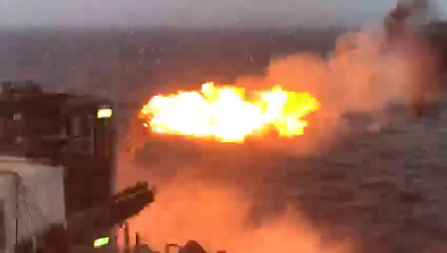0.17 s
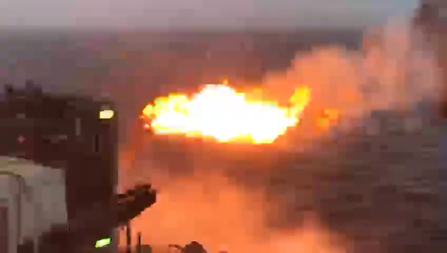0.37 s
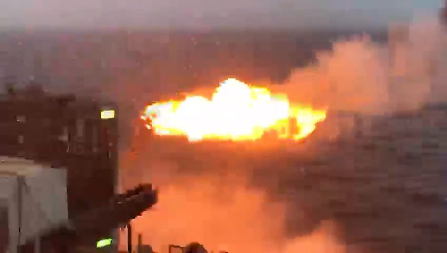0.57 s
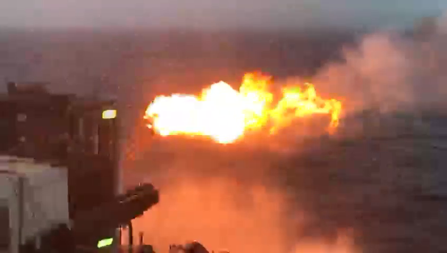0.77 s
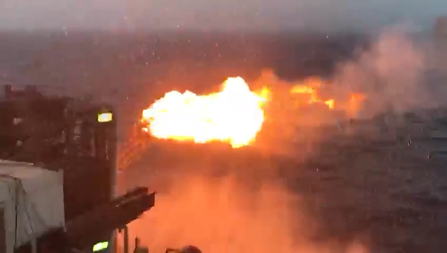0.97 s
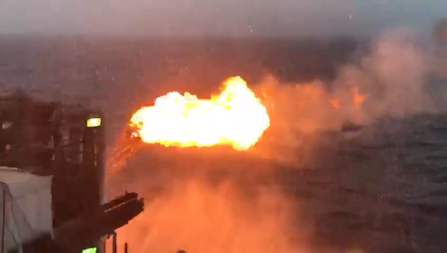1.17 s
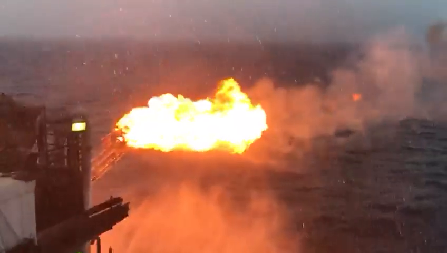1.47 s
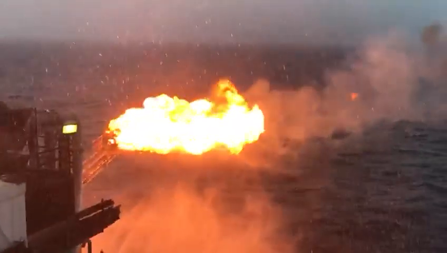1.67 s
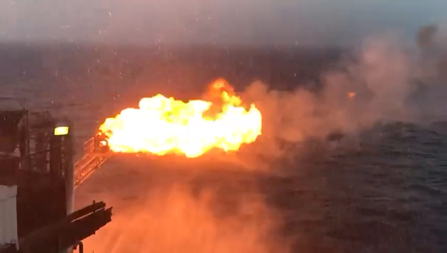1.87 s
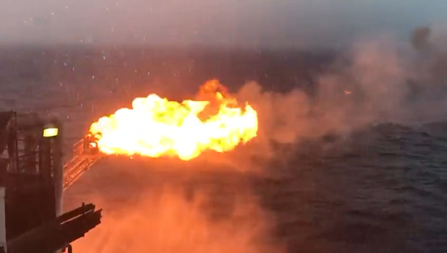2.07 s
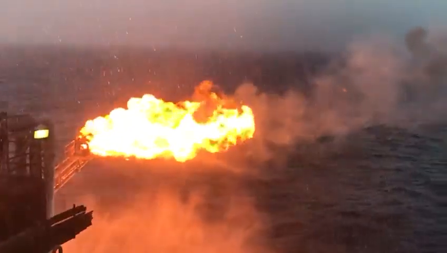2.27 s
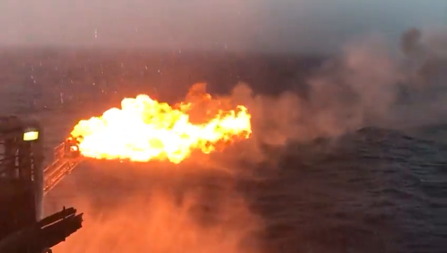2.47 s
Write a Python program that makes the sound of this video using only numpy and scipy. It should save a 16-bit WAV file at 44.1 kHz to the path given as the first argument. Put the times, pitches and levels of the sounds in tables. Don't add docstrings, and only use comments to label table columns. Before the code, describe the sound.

A big gas flare burns loudly over open sea, starting abruptly at about 0.08 seconds after brief silence. Wind buffets the microphone until 0.3; irregular low thumps, rough roar, nozzle hiss and bright flickering spray continue. From 0.96 to 1.35 the sound steps down to quarter speed, sinking in pitch. Deep, slow rumbling and dull rushing follow, with heavy booms near 1.55, 1.9 and 2.24, swelling towards the end.

```python
import sys
import numpy as np
from scipy import signal
from scipy.fft import rfft, irfft, next_fast_len
from scipy.io import wavfile
from scipy.ndimage import uniform_filter1d, map_coordinates

SR = 44100
rng = np.random.default_rng(int(sys.argv[2]) if len(sys.argv) > 2 else 0)


def boost(x):
    u = np.asarray(x, float) / 20
    return 10 ** u


def bounce(signal):
    frames = np.transpose(np.atleast_2d(signal))
    limited = np.clip(frames, -1, 1)
    pcm = np.round(limited * 32767).astype(np.int16)
    wavfile.write(sys.argv[1], SR, pcm)


N = 115983
PAD = next_fast_len(N)
HZ = np.arange(PAD // 2 + 1) * SR / PAD

# (from [s], speed [x real time])
PLAYBACK_SPEEDS = [
    (0, 1.0),
    (.958, .953),
    (1.039, .78),
    (1.169, .585),
    (1.350, .259),
]
# (time [s], roar level [dB], jet level [dB], spray level [dB], sheen of the spray [dB])
FLAME_EFFORT = [(.085, -21, -25.5, -20.5, -2.5), (.14, -21.5, -26.5, -24, 1.5),
                (.24, -27.5, -28, -27.5, 5.5), (.31, -28.5, -25, -24, 2), (.47, -27.5, -22.5, -20, -1),
                (.57, -26, -26, -23.5, 3), (.68, -28, -25, -24.5, 3.5), (.75, -25.5, -21.5, -24.5, 0.5),
                (.86, -28.5, -25.5, -27, 1.5), (.97, -23, -20.5, -25.5, -1), (1.012, -23, -21, -21.5, -9.5),
                (1.045, -27, -21, -25.5, -4.5), (1.2, -26, -22, -23.5, -5), (1.36, -26.5, -21, -21.5, -6),
                (1.8, -24, -21, -26.5, -2.5), (2.2, -24, -21, -24, -5.5), (2.45, -23.5, -23, -22, -3),
                (2.63, -21, -20.5, -18, -6.5)]


def rms_one(x):
    return x / np.sqrt(np.mean(x ** 2) + 1e-20)


def real_time():
    start_s, speed = np.transpose(PLAYBACK_SPEEDS)
    step = np.searchsorted(start_s, np.arange(N) / SR, side="right") - 1
    return np.cumsum(speed[step]) / SR


def in_time(rows):
    s, *columns = np.transpose(rows)
    t = np.arange(N) / SR
    played = np.interp(t, real_time(), t)
    return [np.interp(played, s, column) for column in columns]


def drift(rate):
    pole = np.exp(-80 * np.pi * rate / SR)
    noise = rng.standard_normal(N // 40 + 2002)
    slow = signal.lfilter([1], [1, -2 * pole, pole * pole], noise)[2000:]
    return np.interp(np.arange(N) / 40, np.arange(len(slow)), rms_one(slow))


def turbulence(colour, shared_db, shared_rate, own_db, own_rate):
    octave = np.log2(HZ + 1e-3)
    hz, db = np.transpose(colour)
    shape = boost(np.interp(octave, np.log2(hz), db, left=-200, right=-200))
    spectrum = rfft(rng.standard_normal(PAD)) * shape
    together = shared_db * drift(shared_rate)
    out = 0
    for centre in np.arange(np.floor(np.log2(hz[0])), np.log2(hz[-1]) + .5, .5):
        share = np.cos(np.pi * np.clip(octave - centre, -.5, .5)) ** 2
        band = irfft(spectrum * share, PAD)[:N]
        out = out + band * boost(together + own_db * drift(own_rate))
    return rms_one(out)


def bursts():
    # (time [s], peak level [dB], real-time pitch [Hz], push +1 or pull -1)
    ignitions = [(0.0844, -6, 486, 1), (0.0892, -9.5, 151, -1), (0.102, -8.5, 241, 1), (0.111, -7, 458, -1),
                 (0.1184, -6, 405, 1), (0.1244, -10.5, 350, 1), (.135, -5.5, 401, 1),
                 (0.142, -9.5, 129.4, -1), (.152, -11.5, 89.8, 1), (.172, -9.5, 200, -1),
                 (.2235, -11, 90, -1), (0.254, -9.5, 90, 1), (.288, -11.5, 270, 1), (0.336, -10, 86.8, -1),
                 (.358, -11.5, 200, -1), (.448, -7.5, 65, 1), (.513, -8.5, 120, -1),
                 (0.549, -12.5, 197.3, -1), (0.5564, -4.5, 121.7, -1), (.575, -10.5, 75, -1),
                 (0.6094, -5, 189.4, 1), (0.615, -5.5, 80.4, -1), (0.623, -10, 55, 1),
                 (0.647, -6.5, 250, 1), (0.673, -6, 130, -1), (0.687, -5, 69.6, -1), (.705, -6.5, 83.4, -1),
                 (.737, -6.5, 305.3, -1), (0.755, -11, 88.6, -1), (0.905, -5, 75, -1), (0.944, -6, 81, -1),
                 (0.995, -9, 74.5, -1), (1.086, -9, 84.5, -1), (1.168, -9, 70, -1), (1.21, -10, 55, 1),
                 (1.338, -9, 54, 1), (1.385, -16.5, 652, 1), (1.43, -12.5, 69.2, 1),
                 (1.456, -10.5, 129.7, -1), (1.547, -6, 58.7, 1), (1.587, -10, 73.6, -1),
                 (1.68, -15.5, 403, 1), (1.739, -12, 770, 1), (1.799, -13.5, 58.6, 1),
                 (1.822, -15, 400, -1), (1.897, -6, 60.63, -1), (1.97, -16, 370, 1), (2.031, -15, 69, 1),
                 (2.216, -14, 335, -1), (2.236, -3.5, 78.2, 1), (2.491, -14, 80.5, 1)]
    length_cycles, pitch_sag, duck = 0.68, 0.36, .6
    t, clock = np.arange(N) / SR, real_time()
    swings, left = np.zeros(N), np.ones(N)
    for s, db, hz, way in ignitions:
        cycles = np.clip((t - clock[int(s * SR)]) * hz, -3, 3)
        swell = np.exp(-(cycles / length_cycles) ** 2)
        phase = 2 * np.pi * cycles * (1 - pitch_sag * cycles)
        swings += np.sign(way) * boost(db) * np.cos(phase) * swell
        left = np.minimum(left, 1 - duck * swell)
    return swings, left


def fireball():
    # (time [s], deep throb level [dB], body level [dB])
    strength = [(.085, -20, -21.5), (.2, -20, -23.5), (.45, -23, -27), (.52, -12.5, -22.5), (.62, -17, -19),
                (.7, -14, -22), (.76, -16.5, -20.5), (.88, -19.5, -21.5), (.94, -18.5, -35.5),
                (1.1, -20.5, -30.5), (1.2, -28.5, -27.5), (1.4, -21.5, -31), (1.57, -13.5, -23),
                (1.75, -27.5, -28.5), (1.92, -23, -20.5), (2.12, -24.5, -31), (2.26, -25.5, -21.5),
                (2.62, -12, -25)]
    # (frequency [Hz], density [dB per Hz])
    throb_colour = [(18, -34.5), (34, -14), (48, -4.5), (80, 0.5), (125, -9), (180, -10.5), (260, -22)]
    # (frequency [Hz], density [dB per Hz])
    body_colour = [(90, -11.5), (140, 1.5), (230, -1.5), (320, -6), (480, -34.5)]
    throb_db, body_db = in_time(strength)
    throb = boost(throb_db) * turbulence(throb_colour, 0.33, 11, 0.34, 8.5)
    body = boost(body_db) * turbulence(body_colour, 1.2, 23, 1.0, 5.2)
    return throb + body


def flame_roar():
    # (frequency [Hz], density [dB per Hz])
    roar_colour = [(200, -15), (330, -4.5), (500, -3.5), (650, -2), (900, -20), (1500, -35)]
    roar_db = in_time(FLAME_EFFORT)[0]
    return boost(roar_db) * turbulence(roar_colour, 0.78, 30, 0.41, 4.7)


def gas_jet():
    # (frequency [Hz], density [dB per Hz])
    jet_colour = [(400, -24.5), (700, 1.5), (1000, 4), (1500, 0), (2300, 0), (3300, -24), (5000, -17)]
    jet_db = in_time(FLAME_EFFORT)[1]
    return boost(jet_db) * turbulence(jet_colour, 0.58, 25, 0.95, 4.1)


def wind_gust():
    # (time [s], level [dB])
    strength = [
        (.085, -18),
        (.11, -13.5),
        (.135, -13),
        (.155, -22.5),
        (.2, -25),
        (.3, -50),
    ]
    # (frequency [Hz], density [dB per Hz])
    gust_colour = [(100, -16.5), (180, -11), (350, 1), (600, -2), (900, -7), (1400, -10)]
    gust_db, = in_time(strength)
    return boost(gust_db) * turbulence(gust_colour, 2.0, 45, 0.64, 30)


def surges():
    # (time [s], lift [dB], length [s])
    sheets = [
        (0.304, 3.5, 0.015),
        (0.431, 1.5, .045),
        (0.512, 2.5, .037),
        (0.65, 3, .012),
        (0.668, 1, 0.038),
        (0.877, 4, 0.014),
        (0.989, 2, 0.037),
        (1.1038, 1, 0.026),
        (1.245, -3, 0.016),
        (1.332, 0, 0.013),
    ]
    edge_s = .003
    t, clock = np.arange(N) / SR, real_time()
    lift_db = np.zeros(N)
    for s, db, length in sheets:
        since = t - clock[int(s * SR)]
        arrive = 1 + np.tanh(since / edge_s)
        leave = 1 - np.tanh((since - length) / edge_s)
        lift_db += db / 4 * arrive * leave
    return boost(lift_db)


def sea_spray():
    # (frequency [Hz], density [dB per Hz])
    spray_colour = [(1500, -37), (2500, 0), (3500, 2.5), (4700, -1.5), (6300, -4.5), (7300, -6),
                    (9800, -10), (12000, -17.5)]
    sheen_hz = 4970
    spray_db, sheen_db = in_time(FLAME_EFFORT)[2:]
    spray = turbulence(spray_colour, .9, 31, 0.47, 19)
    dull = irfft(rfft(spray, PAD) / (1 + (HZ / sheen_hz) ** 6), PAD)[:N]
    return boost(spray_db) * surges() * (dull + boost(sheen_db) * (spray - dull))


def scene():
    swings, left = bursts()
    low = left * (fireball() + wind_gust())
    return (low + swings + flame_roar() + gas_jet() + sea_spray())[None]


def camera(x):
    # (frequency [Hz], width [Hz], share of time [0-1])
    seams = [(4700, 70, .12), (5600, 70, .08), (7150, 70, .15), (7600, 60, .35), (8800, 150, .06),
             (9350, 70, .2), (10300, 150, .45), (10600, 130, .25), (11450, 130, .15), (11780, 100, .45)]
    seams_end_s, seam_rate = .95, 14
    low_cut = signal.butter(2, 30, "high", fs=SR, output="sos")
    x = signal.sosfilt(low_cut, x)
    f, _, cells = signal.stft(1.806 * np.tanh(x / 1.89), SR, nperseg=1024)

    streak_db, streak_from_hz, streak_late = 3.0, 770, 0.63
    streaks = uniform_filter1d(rng.standard_normal(cells.shape), size=2, axis=0)
    streaks = rms_one(uniform_filter1d(streaks, size=4, axis=1))
    late = np.arange(cells.shape[1]) * 512 > seams_end_s * SR
    rise = (f / (f + streak_from_hz))[:, None]
    gain_db = streak_db * streaks * np.where(late, streak_late, 1) * rise
    gain_db += 5.5 * np.outer(f > 10200, late)
    x = signal.istft(cells * boost(gain_db), SR, nperseg=1024)[1][:N]

    spectrum = rfft(x, PAD)
    before_end = np.arange(N) < seams_end_s * SR
    for hz, width_hz, share in seams:
        chance = drift(seam_rate)
        dropped = chance > np.quantile(chance, 1 - share)
        empty = uniform_filter1d(1.0 * dropped * before_end, size=500)
        x = x - empty * irfft(spectrum * np.exp(-((HZ - hz) / width_hz) ** 4), PAD)[:N]
    return x


def slow_playback(x):
    bandwidth_hz, over = 11850, 5
    step_tail_s, step_tail_db = 0.037, -12
    t, clock = np.arange(N) / SR, real_time()
    fine = over * irfft(rfft(x, PAD) * (HZ < bandwidth_hz), over * PAD)
    out = np.zeros(N)
    ends = [s for s, _ in PLAYBACK_SPEEDS[1:]] + [np.inf]
    for (s, speed), end in zip(PLAYBACK_SPEEDS, ends):
        at = (clock[int(s * SR)] + speed * (t - s)) * SR * over
        stretch = map_coordinates(fine, [np.clip(at, 0, len(fine) - 1)], order=3)
        fade = np.clip((t - s) / .004, 0, 1) ** 2 if s else 1
        left = np.clip(1 - (t - end) / .004, 0, 1)
        decay = np.clip(1 - (t - end) / step_tail_s, 0, 1)
        tail = boost(step_tail_db) * np.sin(np.pi / 2 * decay) ** 2
        out += fade * (left + (1 - left) * tail) * stretch
    return out * np.clip((t - .0842) / .0003, 0, 1)


def low_pass(x):
    return signal.sosfilt(signal.butter(12, 12050, fs=SR, output="sos"), x)


def record(dry):
    mix = slow_playback(camera(dry[0]))
    return low_pass(np.clip(mix, -1, 1)[None])


dry = scene()
out = record(dry)
bounce(out)
```